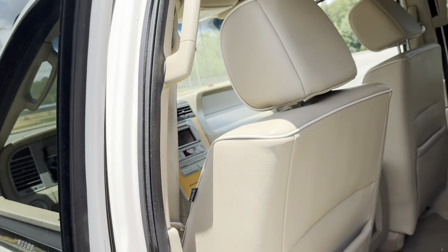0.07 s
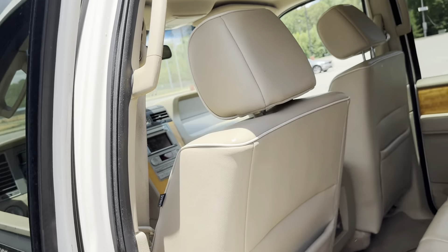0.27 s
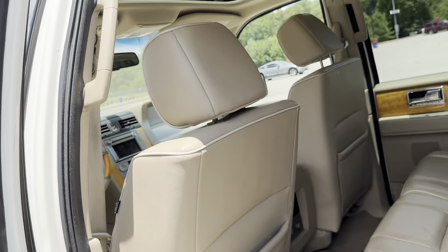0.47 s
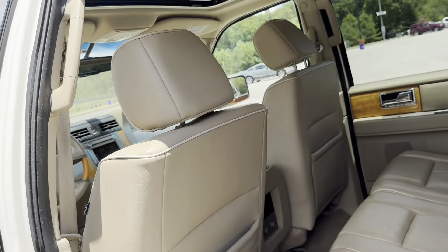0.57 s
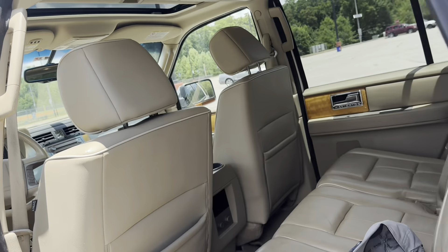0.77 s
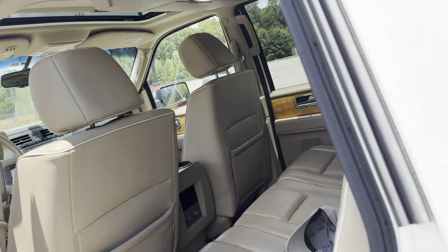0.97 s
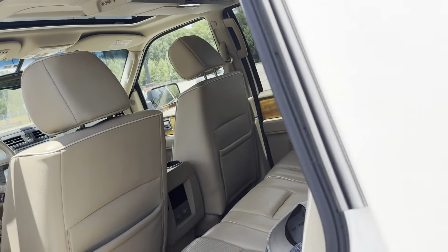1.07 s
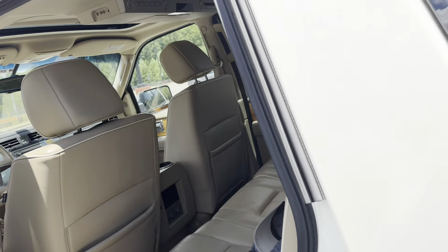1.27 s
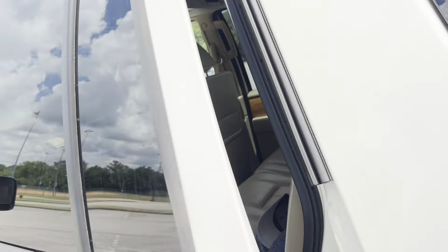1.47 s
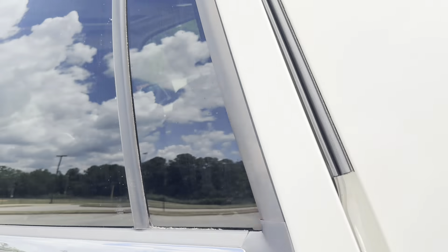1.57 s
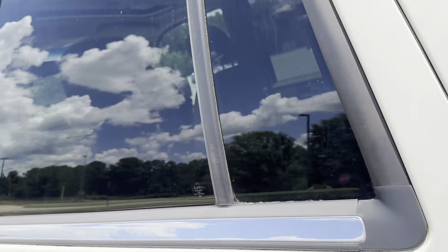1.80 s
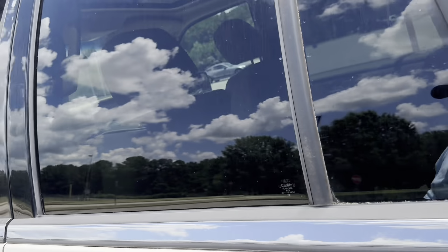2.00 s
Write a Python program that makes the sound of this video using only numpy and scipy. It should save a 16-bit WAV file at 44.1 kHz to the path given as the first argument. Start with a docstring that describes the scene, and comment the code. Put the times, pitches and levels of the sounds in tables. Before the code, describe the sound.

A large vehicle's rear door slams once, close up in an open car park: faint hinge rubbing, ticks and soft handling bumps first, then a hard latch clack, deep boom and lingering low rumble, in stereo.

```python
"""Light wind and distant traffic, soft handling bumps; then a large car's rear door is swung shut at arm's length.
The hinge rubs, squeaks and ticks; the latch catches in a quick run of steel blows, the door skin rings,
the shut-in air booms and a low rumble lingers over the open car park.
Shaped noise makes the air, friction, knocks and tails; damped modes ring the steel and sheet metal;
a sine of sagging pitch makes the boom."""
import sys
import numpy as np
from scipy import signal
from scipy.fft import rfft, irfft
from scipy.io import wavfile

SR = 44100
rng = np.random.default_rng(int(sys.argv[2]) if len(sys.argv) > 2 else 0)


def waveform_to_disk(signal):
    """Save audio, clipped to [-1, 1], as 16-bit WAV at the path in sys.argv[1]."""
    frames = np.transpose(np.atleast_2d(signal))
    scaled = np.clip(frames, -1, 1) * 32767
    samples = np.round(scaled).astype(np.int16)
    wavfile.write(sys.argv[1], SR, samples)


N = 89919  # samples
T, HZ = np.arange(N) / SR, np.fft.rfftfreq(N, 1 / SR)


def amp(db):
    """Decibels to gain."""
    return 10 ** (np.asarray(db) / 20)


def along(points):
    """Join (f/Hz, value) points on a log-frequency axis."""
    hz, value = np.array(points).T
    return np.interp(np.log(HZ + 1), np.log(hz), value)


def noise(colour, apart_hz=3000., apart=0.4):
    """Coloured stereo noise of rms 1; the channels part towards the treble."""
    mid, side = rfft(rng.standard_normal((2, N)))
    width = apart * HZ / (HZ + apart_hz) + 0.11
    left_right = mid + width * side * np.array([[1], [-1]])
    y = irfft(left_right * amp(along(colour)), N)
    return y / y.std()


def decay(age, t60):
    """Exponential fade by 60 dB in t60 seconds."""
    return np.exp(-np.log(1000) * age / t60)


def burst(start, attack, t60, hold=0):
    """Envelope: linear attack, hold, exponential release (all in s)."""
    age = T - start
    return np.clip(age / attack, 0, 1) * decay(np.maximum(age - attack - hold, 0), t60)


def swell(start, length):
    """Envelope: a half-sine rise and fall."""
    return np.sin(np.pi * np.clip((T - start) / length, 0, 1))


def push(start, contact):
    """A smooth force pulse of unit area."""
    pulse = np.sin(np.pi * np.clip((T - start) / contact, 0, 1)) ** 2
    return pulse / pulse.sum()


def ring(modes, force):
    """Damped modes driven by a force; neighbours swing in opposite senses."""
    response = np.zeros(N)
    for k, (hz, db, t60) in enumerate(modes):
        response += (-1) ** k * amp(db) * np.sin(2 * np.pi * hz * T) * decay(T, t60)
    return signal.fftconvolve(force, response)[:N]


def resonance(hz, width_hz):
    """Friction noise of rms 1 in one narrow resonance whose centre may slide."""
    lowpass = 1 / (1 + (2 * HZ / width_hz) ** 2)
    jitter = irfft(rfft(rng.standard_normal((2, N))) * lowpass, N)
    phase = 2 * np.pi * np.cumsum(hz * np.ones(N)) / SR
    return (jitter[0] * np.cos(phase) + jitter[1] * np.sin(phase)) / jitter.std()


# colour of the distant traffic (f/Hz, relative level/dB)
TRAFFIC_COLOUR = [(30, -18.5), (60, 0), (120, 0), (450, -22), (1000, -25), (2500, -34), (7000, -35.5),
                  (9500, -49)]


def distant_traffic():
    """Many far engines and tyres blend into a steady, dark noise bed."""
    return amp(-55) * noise(TRAFFIC_COLOUR, 500., 1.0)


# colour of the moving air (f/Hz, relative level/dB)
WIND_COLOUR = [(20, -9.5), (65, 5), (200, -19), (400, -25.5), (15000, -58)]
# level of the air as the door swings (t/s, level/dB)
SWING_LEVEL = [(0, -62.5), (.86, -54.5), (.91, -49), (.96, -60.5), (1.25, -49), (1.55, -43), (1.8, -55)]


def stirred_air():
    """Low wind noise swells as the swinging door stirs the air."""
    return amp(np.interp(T, *np.array(SWING_LEVEL).T)) * noise(WIND_COLOUR, 270.0, 1.0)


# soft handling bumps (t/s, level/dB, t60/s)
BUMPS = [(.506, -50.5, 0.14), (1.039, -37, 0.043), (1.064, -47, 0.18), (1.139, -52, 0.13),
         (1.297, -39, 0.07)]
# their dull colour (f/Hz, relative level/dB)
BUMP_COLOUR = [(60, -28), (150, 1), (420, -1.5), (580, -15), (950, -27), (2000, -35.5), (8000, -56)]


def handling():
    """Soft contacts make dull noise bumps, with a longer rustle of the same colour."""
    envelope = amp(-59) * burst(0.639, attack=0.092, t60=0.4, hold=0.57)  # rustle
    for start, db, t60 in BUMPS:
        envelope += amp(db) * burst(start, attack=0.0042, t60=t60)
    return envelope * noise(BUMP_COLOUR, 680.0, 0.69)


# ticks of hinge and door check (t/s, level/dB, t60/s)
TICKS = [(.078, -64, .06), (0.474, -53, 0.042), (1.103, -53.5, 0.083), (1.495, -49.5, 0.073),
         (1.522, -53.5, 0.082), (1.532, -47, 0.067), (1.582, -52, 0.025)]
# their colour (f/Hz, relative level/dB)
TICK_COLOUR = [(200, 2), (700, -1), (1200, 3), (3000, -5), (6000, -10), (9000, -20.5)]


def hinge_ticks():
    """Hinge and door check let go in small, sharp bursts of noise."""
    envelope = sum(amp(db) * burst(start, attack=0.0012, t60=t60) for start, db, t60 in TICKS)
    return envelope * noise(TICK_COLOUR, 1000., 0.67)


# light hollow taps, the last as the latch brushes the striker (t/s, level/dB, t60/s)
TAPS = [(.46, -59, .06), (0.506, -52.5, 0.052), (1.296, -49.5, 0.037), (1.5973, -35, 0.034)]
# their hollow colour, peaked in the low mids (f/Hz, relative level/dB)
TAP_COLOUR = [(300, -25.5), (830, 7), (1600, -23.5), (15000, -47)]


def hollow_taps():
    """Light touches sound as short noise bursts around one broad hollow peak."""
    envelope = sum(amp(db) * burst(start, attack=0.0014, t60=t60) for start, db, t60 in TAPS)
    return envelope * noise(TAP_COLOUR, 600., 0.84)


# faint rubbing as the door swings (t/s, resonance f/Hz, level/dB)
RUB = [(.24, 1956, -75.5), (.44, 1717, -66), (.6, 1350, -71.5), (.86, 1316, -79), (1., 1305, -110)]
# thin squeaks of the hinge (t/s, length/s, f/Hz, level/dB)
SQUEAKS = [(1.095, .12, 1770, -68.5), (1.273, 0.17, 1360, -67), (1.276, 0.16, 1800, -72.5)]
# swells of dry sliding hiss (t/s, length/s, peak level/dB)
SLIDES = [(.28, 0.35, -67.5), (1.233, 0.25, -71.5)]
# colour of the hiss (f/Hz, relative level/dB)
SLIDE_COLOUR = [(2600, -3.5), (3800, 5), (5700, -1), (9000, -30)]


def rubbing():
    """Friction starts with a knock, rubs with a falling resonance and a dry hiss, then squeaks thinly."""
    times, pitch, levels = np.array(RUB).T
    knock = amp(-62.5) * burst(times[0], attack=.004, t60=0.038)
    effort = amp(np.interp(T, times, levels)) * (T > times[0]) + knock
    rub = effort * resonance(np.interp(T, times, pitch), width_hz=410)
    squeaks = sum(amp(db) * swell(start, length) * resonance(hz, width_hz=110)
                  for start, length, hz, db in SQUEAKS)
    hiss = sum(amp(db) * swell(start, length) for start, length, db in SLIDES) * noise(SLIDE_COLOUR)
    return rub + squeaks + hiss


# bright steel snap, also the colour of the near reflection (f/Hz, relative level/dB)
SNAP_COLOUR = [(800, 3.5), (2000, 5), (3300, 5.5), (4100, -2.5), (4800, 0), (6500, -3.5), (9000, -9.5),
               (11500, -4.5), (15500, -10.5)]
# colour of the car park's answer (f/Hz, relative level/dB)
PARK_COLOUR = [(200, 9.5), (700, 4), (1600, -0.5), (2300, -13.5), (3300, -6.5), (5000, -21), (15000, -34)]


def scatter():
    """Noise tails bring the slam back briefly from the car's side, and faintly from the car park."""
    near = amp(-54.5) * burst(1.64, attack=.02, t60=0.32) * noise(SNAP_COLOUR, 1000., .7)
    park = amp(-45) * burst(1.627, attack=0.032, t60=0.88) * noise(PARK_COLOUR, 500., 0.99)
    return near + park


# colour of the body rumble (f/Hz, relative level/dB)
RUMBLE_COLOUR = [(20, -20), (38, -2), (68, 0), (100, -10), (300, -27.5), (1200, -59), (16000, -100)]


def body_rumble():
    """The car body rumbles on as a slowly fading low noise."""
    return amp(-26) * burst(1.631, attack=0.028, t60=2.26, hold=0.053) * noise(RUMBLE_COLOUR, 300., 1.0)


def cabin_boom():
    """The trapped air swings a few times, its pitch sagging as the seal settles."""
    start, level_db = 1.641, -9.5
    start_hz, settled_hz, sag_s = 106, 41.4, 0.027
    age = np.maximum(T - start, 0)
    hz = settled_hz + (start_hz - settled_hz) * np.exp(-age / sag_s)
    swing = -np.sin(2 * np.pi * np.cumsum(hz * (age > 0)) / SR)
    return amp(level_db) * burst(start, attack=0.0203, t60=0.037, hold=0.026) * swing


# door skin modes (f/Hz, relative level/dB, t60/s)
SKIN_MODES = [(101.3, 1, 0.45), (126, 3.5, 0.43), (160.4, 4.5, 0.42), (212.1, -2.5, 0.51),
              (261.8, -2, 0.39), (287.7, -3, 0.35), (333, -4, 0.307), (353.5, -1, 0.236), (393.5, -1, 0.27),
              (432, -3.5, 0.28), (488, -13.5, 0.38)]
# colour of trim and panels (f/Hz, relative level/dB)
TRIM_COLOUR = [(40, -19), (170, -3), (380, -6), (520, -15.5), (1200, -33.5), (16000, -66.5)]


def door_skin():
    """The door lands on its rubber seal: sheet metal rings and trim shudders, once more on the rebound."""
    metal = amp(-23.5) * ring(SKIN_MODES, push(1.639, contact=0.00099))
    trim = amp(-23.5) * burst(1.634, attack=0.0049, t60=0.23, hold=0.046) * noise(TRIM_COLOUR, 600., 0.54)
    rebound = amp(-24) * burst(1.718, attack=0.0029, t60=0.058) * noise(TRIM_COLOUR, 600., .3)
    return metal + trim + rebound


# the striker scraping into the latch fork (f/Hz, relative level/dB)
SCRAPE_COLOUR = [(150, -20), (400, 0), (1400, 2), (2000, -7.5), (2800, -24.5), (5000, -31), (9000, -47.5)]
# latch and frame blows (t/s, clack level/dB, snap level/dB, clack t60/s)
BLOWS = [(1.6352, -16.5, -22, 0.02), (1.6394, -22, -44, 0.014), (1.6496, -28, -33.5, 0.029),
         (1.6693, -25, -40, 0.06), (1.678, -32.5, -66, 0.044), (1.7176, -38.5, -56, 0.069)]
# dense ring of the latch housing (f/Hz, relative level/dB)
CLACK_COLOUR = [(150, -3.5), (650, 6), (1350, -1.5), (1800, -8.5), (2500, -17.5), (4000, -31.5),
                (16000, -58)]
# modes of the latch steel (f/Hz, relative level/dB, t60/s)
LATCH_MODES = [(601, -6.5, 0.25), (704, -6.5, 0.13), (808, -2, 0.14), (951.6, 1, 0.11), (1262, 1, 0.14),
               (1432, -9.5, .16), (1550, -9, 0.15), (1662, -11.5, 0.15), (1820, -2.5, 0.14),
               (2640, -14.5, 0.13), (3145, -12, 0.12), (3670, -18, 0.057)]


def latch():
    """The striker scrapes in; each blow cracks, snaps and clacks in the housing and rings the steel."""
    clack_attack, snap_attack = 0.0013, 0.0011  # s
    steel_db, crack_db = -10, 0.5  # relative to each blow's clack and snap
    scrape = amp(-18.5) * burst(1.6224, clack_attack, t60=0.13, hold=.014) * noise(SCRAPE_COLOUR, 800., 0.27)
    clack, snap, force = np.zeros((3, N))
    for start, clack_db, snap_db, clack_t60 in BLOWS:
        clack += amp(clack_db) * burst(start, clack_attack, clack_t60)
        # a brief crack opens each snap
        crack = amp(crack_db) * burst(start, snap_attack, t60=0.0075)
        snap += amp(snap_db) * (burst(start, snap_attack, t60=0.069) + crack)
        force += amp(clack_db) * push(start, contact=0.00029)
    steel = amp(steel_db) * ring(LATCH_MODES, force)
    housing = clack * noise(CLACK_COLOUR, 800., 0.24)
    return housing + snap * noise(SNAP_COLOUR, 2000., 0.18) + steel + scrape


# level balance of the two microphone ports (f/Hz, left minus right level/dB)
PORT_LEVEL = [(60, 0), (400, 0.5), (680, -6.5), (1300, -6), (2400, -1.5), (4400, 0.5), (8000, 0.5),
              (15000, 0.5)]
# phase between the ports (f/Hz, left lead/rad)
PORT_PHASE = [(100, 0), (250, 0.02), (600, 0.7), (3000, 0.5), (5500, 1), (8200, 2), (11000, 1.5)]


def ports(x):
    """The two microphone ports hear the door with unequal level and phase."""
    half = amp(along(PORT_LEVEL) / 2) * np.exp(.5j * along(PORT_PHASE))
    return irfft(rfft(x) * np.array([half, 1 / half]), N)


def scene():
    """The door swings and slams over wind and distant traffic."""
    background = distant_traffic() + stirred_air() + handling()
    swinging = hinge_ticks() + hollow_taps() + rubbing()
    slam = ports(body_rumble() + cabin_boom() + door_skin() + latch())
    return background + swinging + scatter() + slam


def record(dry):
    """The recorder rounds peaks towards a ceiling and cuts the top of the treble."""
    ceiling, top_hz = .8, 15900
    rounded = dry / (1 + (dry / ceiling) ** 6) ** (1 / 6)
    top_cut = signal.ellip(10, .2, 80, top_hz, fs=SR, output="sos")
    return signal.sosfilt(top_cut, rounded)


dry = scene()
out = record(dry)
waveform_to_disk(out)
```